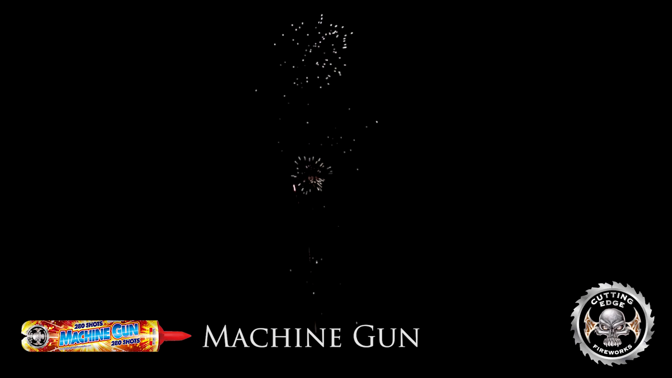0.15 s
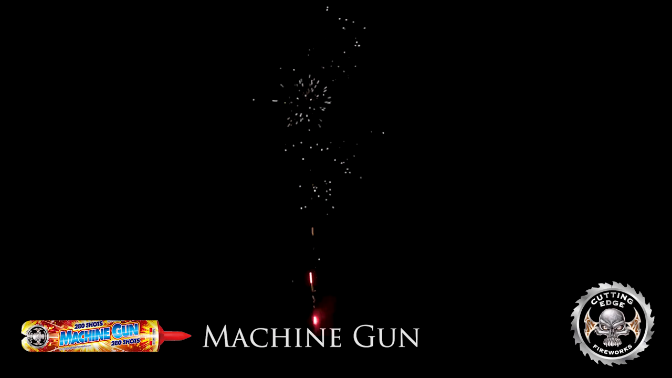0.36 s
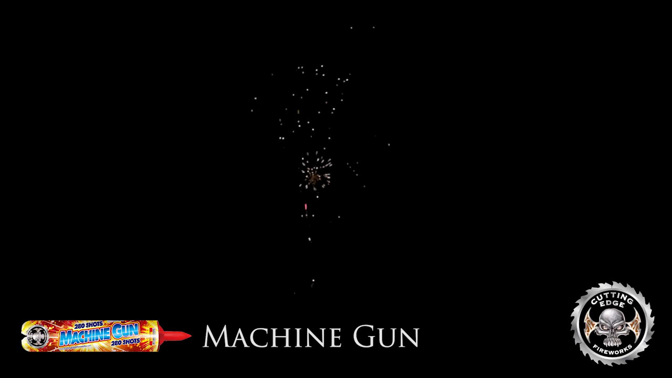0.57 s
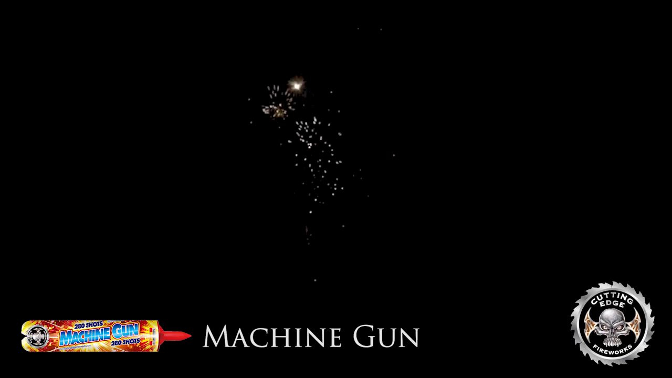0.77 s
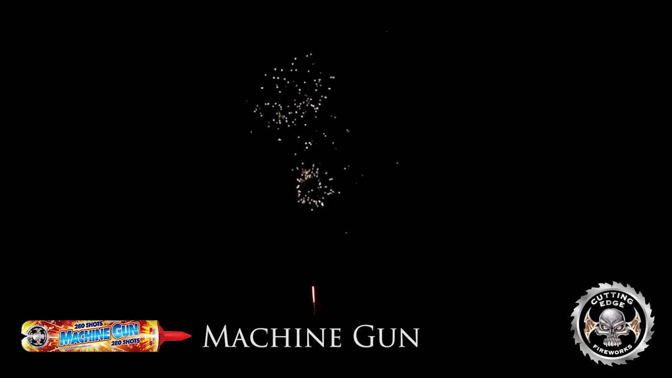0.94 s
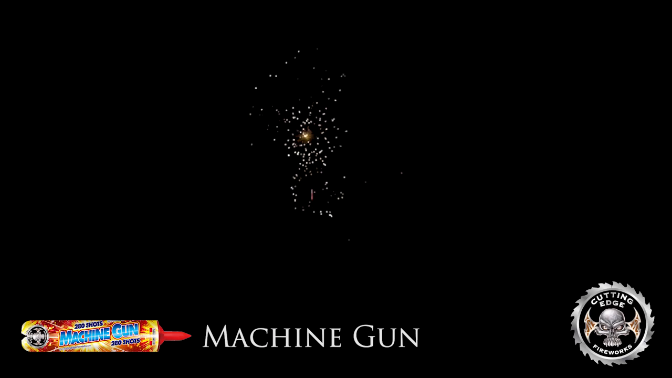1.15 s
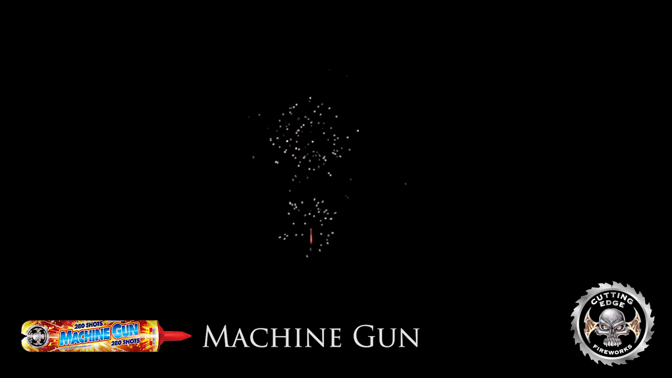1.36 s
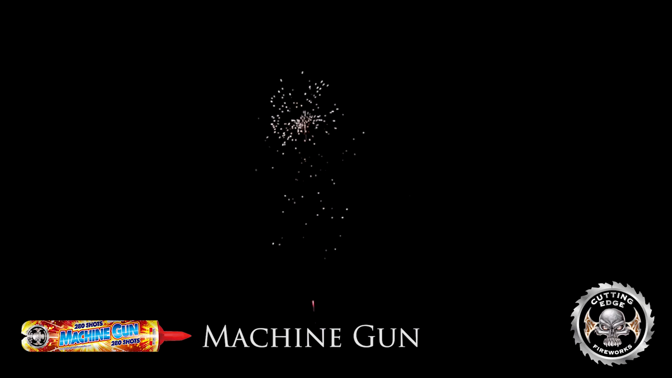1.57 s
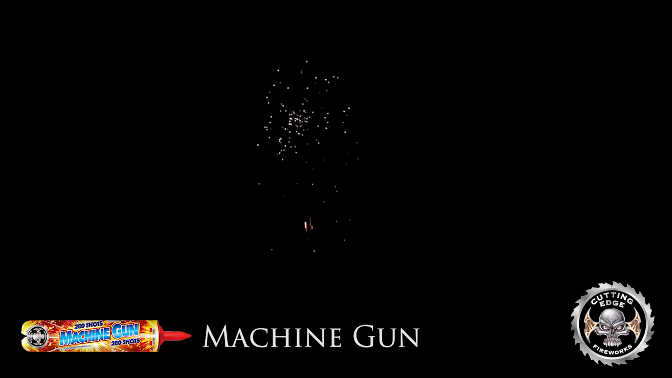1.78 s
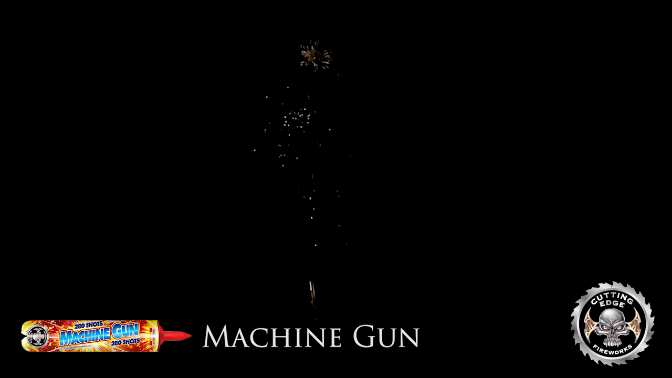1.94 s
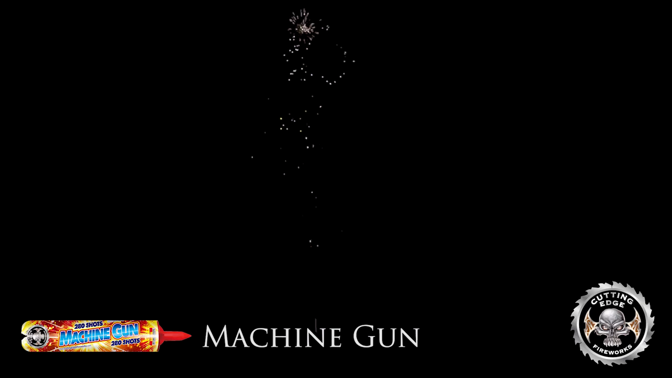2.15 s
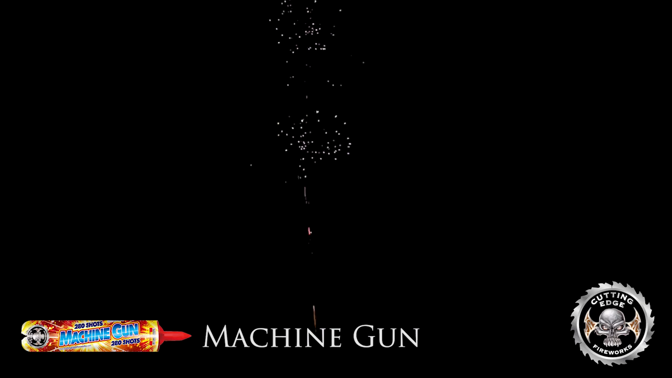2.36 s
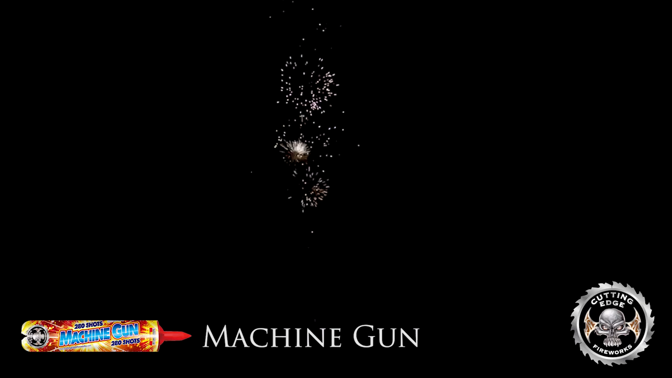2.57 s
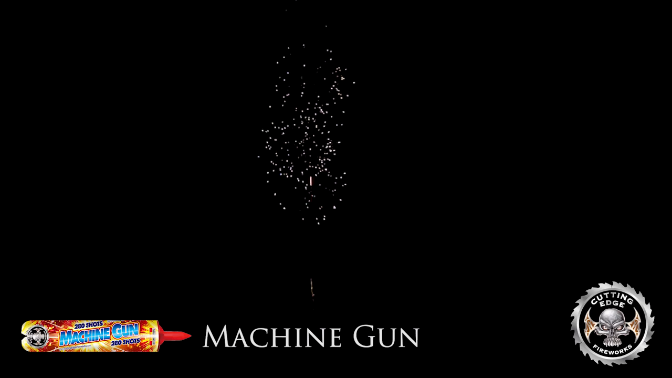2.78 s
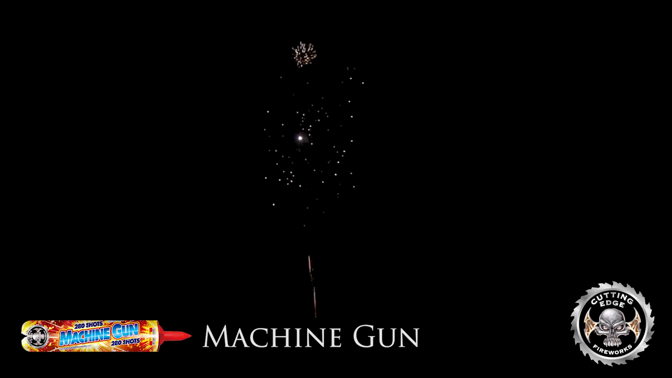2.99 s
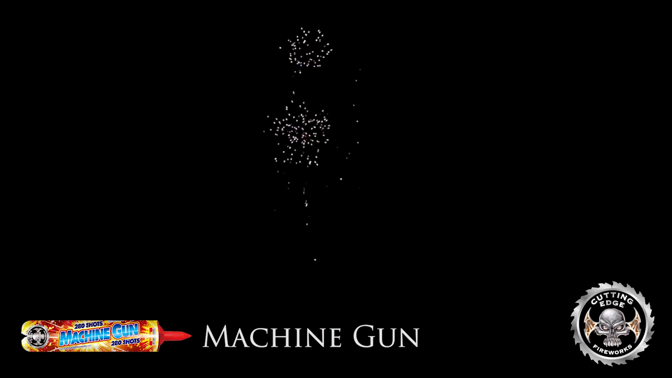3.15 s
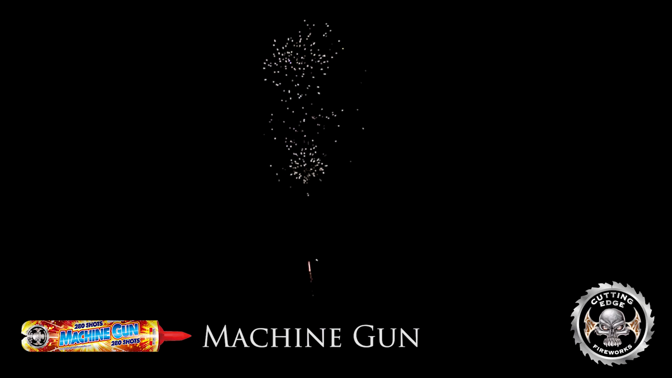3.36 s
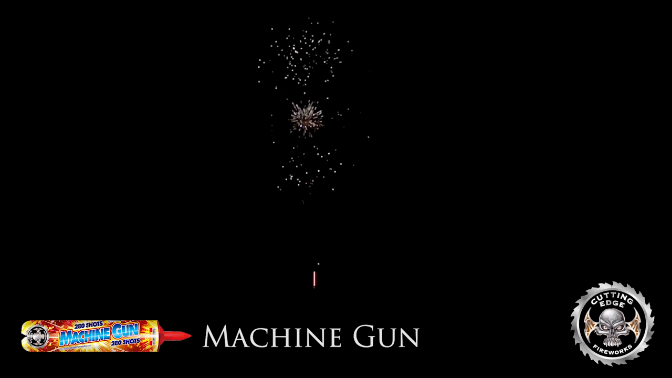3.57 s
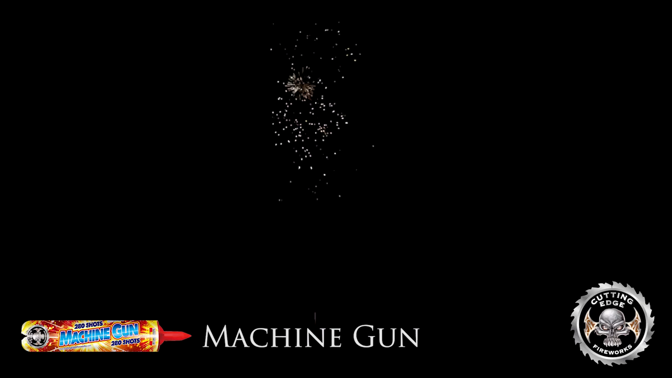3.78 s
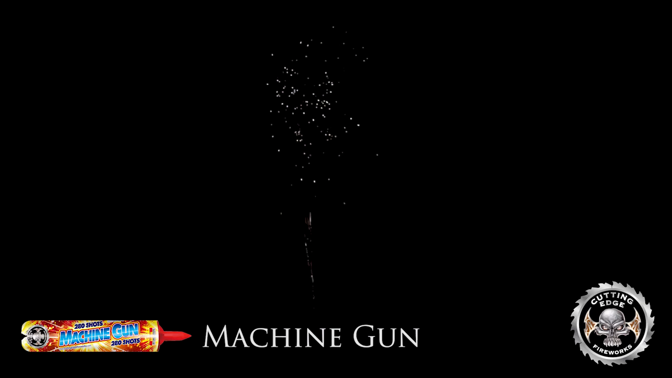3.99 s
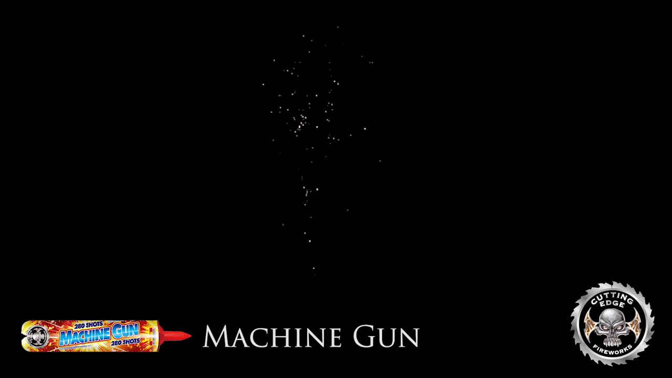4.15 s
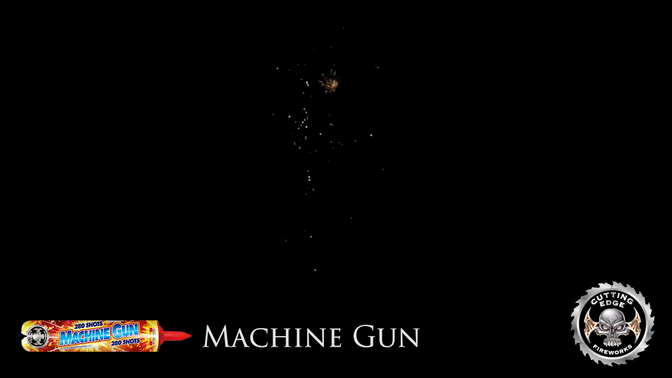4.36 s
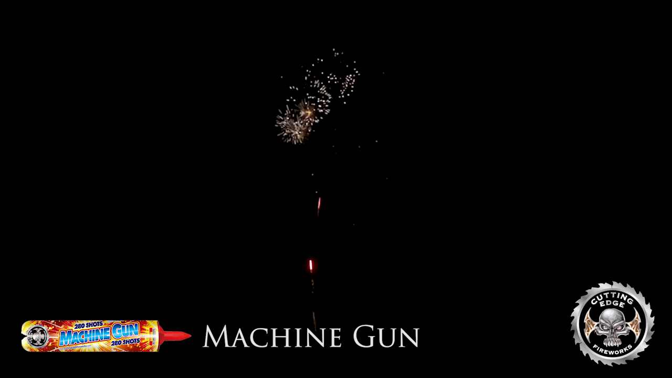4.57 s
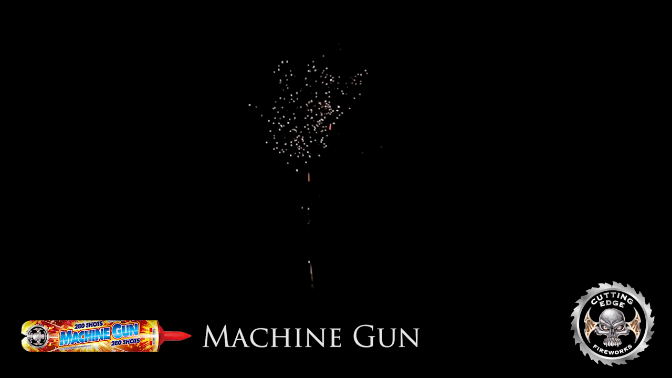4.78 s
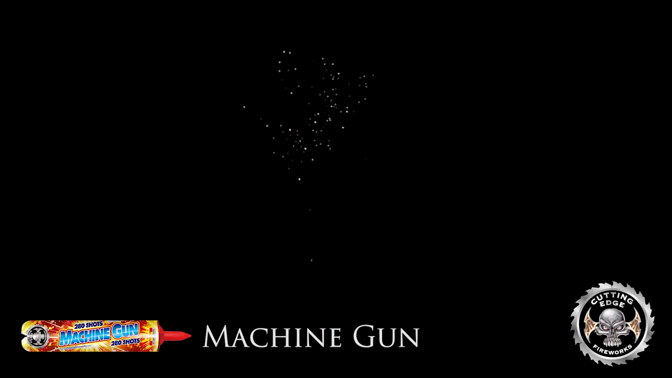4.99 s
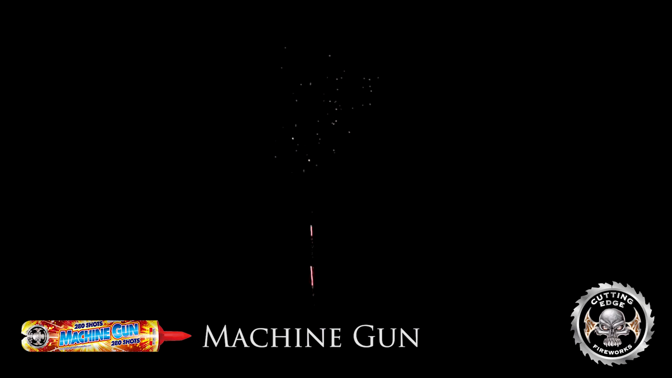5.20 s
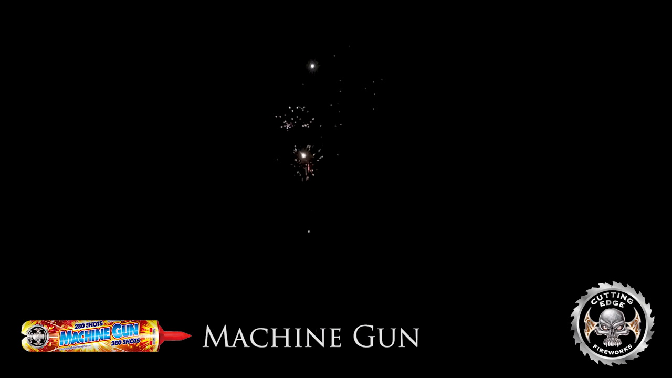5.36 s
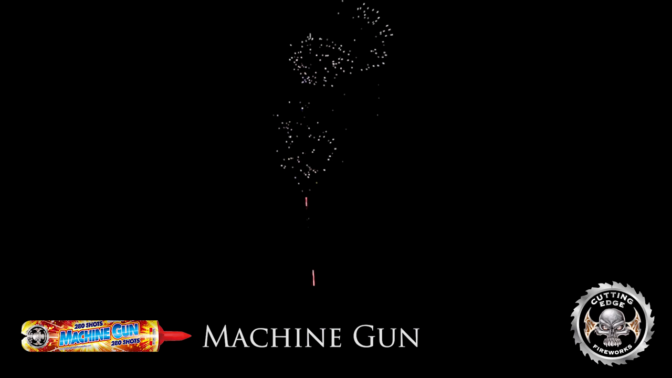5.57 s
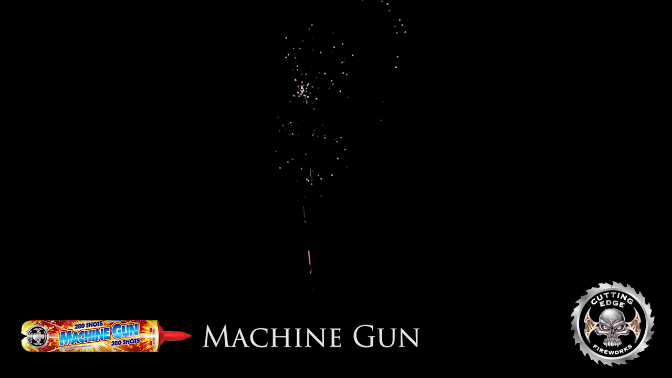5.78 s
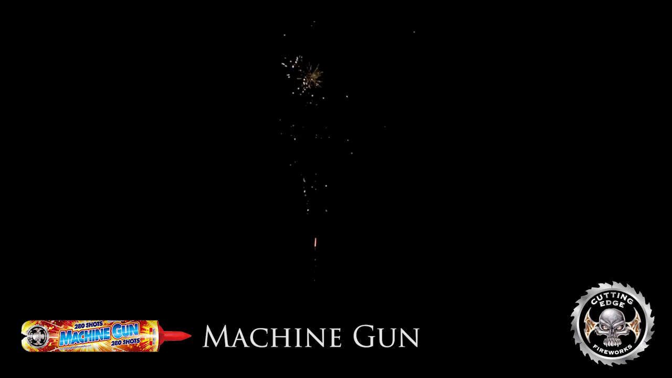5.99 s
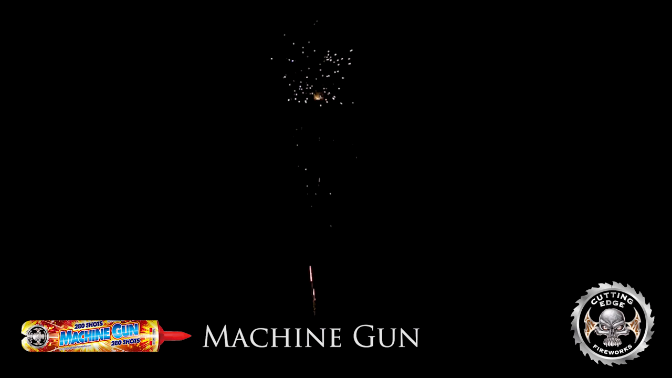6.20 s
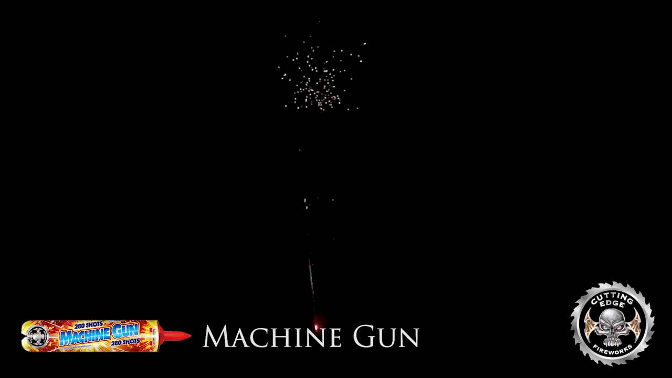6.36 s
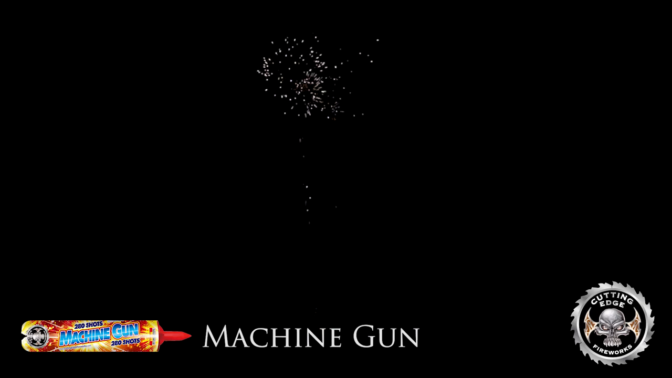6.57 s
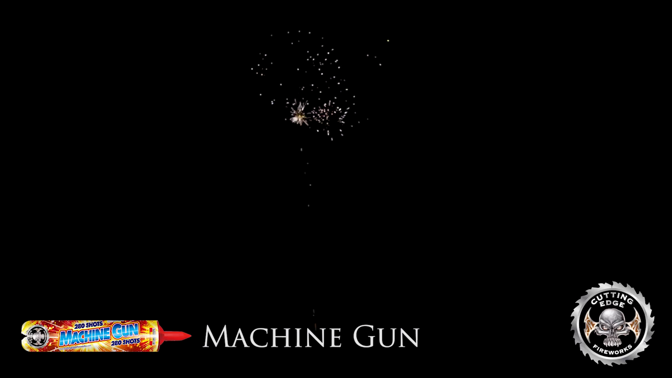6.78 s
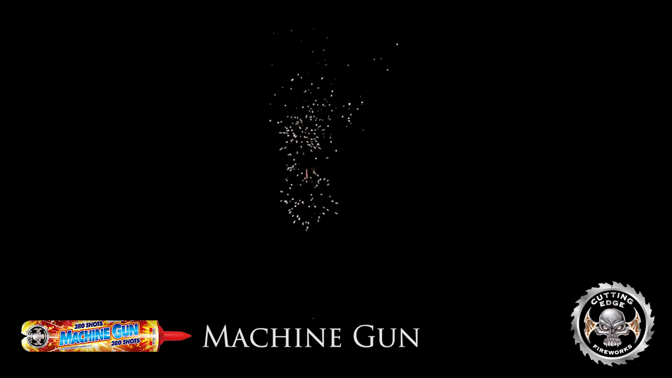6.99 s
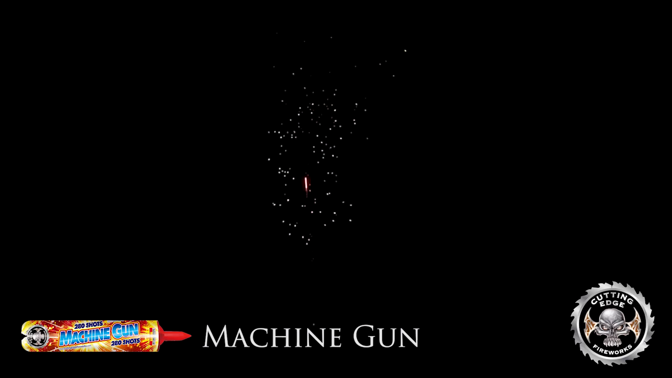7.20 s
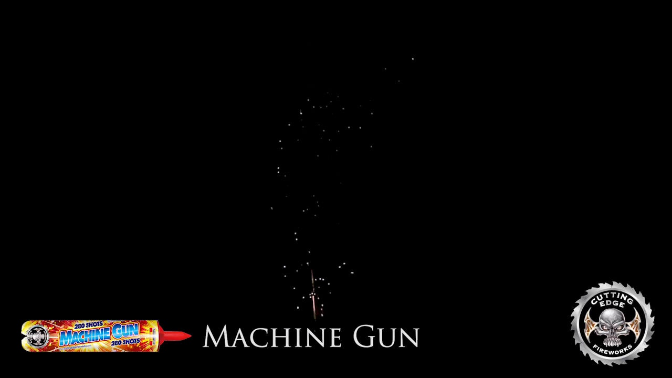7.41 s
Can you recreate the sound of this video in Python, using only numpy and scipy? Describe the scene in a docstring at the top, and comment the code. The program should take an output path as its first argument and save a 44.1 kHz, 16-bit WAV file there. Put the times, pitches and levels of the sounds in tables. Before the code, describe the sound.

A firework candle fires rapid sharp cracking bursts and low tube thumps in an open night field, with crackling sparks and faint insects.

```python
"""Insects sing in an open field at night, over the hush of the air and a little wind rumbling on the microphone.
Then a firework candle fires quickly: each lift charge thumps out of the tube with a puff of gas made of
spiky noise. Each star bursts overhead as a shock with a ground echo, then fizzes away in fine crackle and
single snaps made of random pops. One low thud is a fading sine. The small microphone overloads."""
import sys
import numpy as np
from scipy import signal
from scipy.fft import rfft, irfft, next_fast_len
from scipy.io import wavfile

SR = 44100
rng = np.random.default_rng(int(sys.argv[2]) if len(sys.argv) > 2 else 0)


def unload_audio(sound):
    """Save the sound as a 16-bit wav file, at the path given as the first command line argument."""
    columns = np.transpose(np.atleast_2d(sound))
    # keep every value between -1 and 1, then stretch to whole-number steps
    steps = np.round(np.clip(columns, -1, 1) * 32767)
    wavfile.write(sys.argv[1], SR, steps.astype(np.int16))


def makeup_ratio(level_db):
    """Linear amplitude ratio for a level in decibels (20 dB per factor of ten)."""
    decades = np.asarray(level_db, float) / 20
    return 10 ** decades


N = 328104


def rms_one(x):
    """Scale a sound to an rms of 1."""
    return x / np.sqrt(np.mean(x ** 2) + 1e-20)


def coloured(x, spectrum):
    """Shape a sound by a (frequency [Hz], gain [dB]) spectrum, then scale it to rms 1."""
    hz, db = np.transpose(spectrum)
    size = next_fast_len(N)
    log_hz = np.log(np.arange(size // 2 + 1) * SR / size + 1)
    gain = makeup_ratio(np.interp(log_hz, np.log(hz), db))
    return rms_one(irfft(rfft(x, size) * gain, size)[:N])


def band(x, low_hz, high_hz):
    """Keep only the sound between two frequencies."""
    return signal.sosfilt(signal.butter(2, [low_hz, high_hz], "band", fs=SR, output="sos"), x)


def drift(rate_hz):
    """Slow random wandering with spread 1, drawn at every 100th sample."""
    r = np.exp(-200 * np.pi * rate_hz / SR)
    slow = signal.lfilter([1], [1, -2 * r, r * r], rng.standard_normal(N // 100 + 502))[500:]
    return np.interp(np.arange(N) / 100, np.arange(len(slow)), rms_one(slow))


def add(out, s, shape, lead_ms):
    """Lay a shape down so that its zero time falls at s."""
    i = round((s - lead_ms / 1000) * SR)
    out[i:i + len(shape)] += shape[:N - i]


# insect choruses: (centre [Hz], width [Hz], throb rate [1/s], throb depth [0-1], level before throbbing [dB])
CHORUSES = [(2630, 190, 32, 0.35, -49.5), (6680, 950, 178.7, 0.6, -47)]


def insects():
    """Two choruses: noise in a narrow band, throbbing at the wing-stroke rate."""
    out, s = np.zeros(N), np.arange(N) / SR
    for hz, width_hz, per_s, depth, db in CHORUSES:
        song = rms_one(band(rng.standard_normal(N), hz - width_hz / 2, hz + width_hz / 2))
        throb = 1 + depth * np.sin(2 * np.pi * per_s * s + 1.5 * drift(3.0))
        out += makeup_ratio(db + 0.5 * drift(5.0)) * throb * song
    return out


# colour of the night's hush: (frequency [Hz], relative level per Hz [dB])
NIGHT_COLOUR = [(60, -5), (150, -10.5), (400, -15.5), (1000, -9), (2000, -7.5), (4500, -14), (11500, -21),
                (15500, -15.5)]


def night_air():
    """The broad hush of the night: steady coloured noise."""
    level_db = -45.5
    return makeup_ratio(level_db) * coloured(rng.standard_normal(N), NIGHT_COLOUR)


# wind on the microphone: (time [s], rumble level before its random swelling [dB])
WIND_LEVELS = [(0.0, -48), (1.14, -50), (2.09, -64), (3.11, -48), (3.47, -59), (7.08, -45), (7.3, -35)]


def wind():
    """Lumpy rumble: very low noise whose level wanders around a slow curve."""
    level_db = np.interp(np.arange(N) / SR, *np.transpose(WIND_LEVELS))
    return rms_one(band(rng.standard_normal(N), 24.5, 50.6)) * makeup_ratio(level_db + 3.8 * drift(9.2))


# lift charges: (time [s], thump strength [dB], gas puff strength [dB])
LIFT_CHARGES = [(0.041, -21.5, -30), (0.1406, -21.5, -28.5), (0.1514, -18, -26.5), (0.3308, -17.5, -22),
                (0.404, -22, -33.5), (0.498, -23, -32), (0.531, -22, -32), (0.854, -19, -25.5),
                (1.1733, -16.5, -21), (1.2399, -19, -20.5), (1.5299, -17, -25), (1.7883, -23.5, -33),
                (1.855, -24, -34), (1.8611, -24.5, -32), (2.104, -23, -38), (2.1214, -25, -29),
                (2.436, -18.5, -25), (2.6158, -19, -23.5), (2.6432, -18, -23.5), (2.8236, -20, -30),
                (2.945, -21.5, -30.5), (3.1065, -16.5, -24), (3.175, -23, -28), (3.181, -24, -26.5),
                (3.2255, -17.5, -24), (3.775, -20, -32), (4.1055, -18.5, -24), (4.1204, -20.5, -26),
                (4.183, -22, -22.5), (4.304, -40, -31), (4.6661, -18, -24.5), (4.837, -21.5, -37),
                (4.9378, -19, -27.5), (5.315, -19.5, -29.5), (5.4202, -16.5, -23.5), (5.786, -19, -25.5),
                (5.9, -19, -24), (5.956, -19.5, -28.5), (6.1003, -22, -35.5), (6.3455, -20.5, -31.5),
                (6.4077, -20.5, -22.5), (6.5404, -24, -29.5), (6.5527, -21.5, -27), (7.046, -20, -27),
                (7.2738, -16.5, -24.5)]
# pressure swings of one lift, direct and echoed: (time after the lift [ms], width [ms], height [ratio],
# share of the thump's dB that it follows [ratio], random spread [dB])
PRESSURE_SWINGS = [(0, 1.3, 1.14, 2, 1.5), (2.9, 1.57, -1.15, 1, 0.3), (5.8, 0.85, 0.17, 0.9, 0.5),
                   (8.38, 1.16, -0.19, 0, 8.5), (11.65, 3.8, 0.46, 1.4, 3), (20.5, 6.6, -0.088, 0, 6)]
# colour of the gas puff: (frequency [Hz], relative level per Hz [dB])
PUFF_COLOUR = [(290, -45), (500, -18), (705, -9), (2150, 2.5), (2900, -5.5), (3900, 0), (15400, -20.5)]


def lifts():
    """A soft low push out of the tube with its swings, and a ragged puff of gas riding on it."""
    usual_db = -20   # a thump of this strength leaves every swing at its own height
    out, ms = np.zeros(N), np.arange(-5, 60, 1000 / SR)
    spit = rng.standard_normal(N) * makeup_ratio(3.8 * np.minimum(rng.exponential(1, N), 4))
    spit = coloured(spit, PUFF_COLOUR) * makeup_ratio(3.15 * drift(140.0))
    throat = rms_one(band(band(rng.standard_normal(N), 156, 303), 156, 303))   # gas throbbing in the tube
    gust = np.clip((ms + 1.8) / 2.75, 0, 1) * (np.exp(-(ms / 8.6) ** 4) + 0.46 * np.exp(-ms / 20.5))
    throb_rise = np.clip(ms / 6.8, 0, 1)
    throb_fade = np.exp(-(ms / 13.5) ** 2) + 0.22 * np.exp(-ms / 53.0)
    chance = rng.standard_normal((len(LIFT_CHARGES), len(PRESSURE_SWINGS)))
    for k, (s, thump_db, puff_db) in enumerate(LIFT_CHARGES):
        wave = np.zeros(len(ms))
        for (at, width, height, share, spread_db), luck in zip(PRESSURE_SWINGS, chance[k]):
            swing_db = usual_db + share * (thump_db - usual_db) + spread_db * luck
            wave += height * makeup_ratio(swing_db) * np.exp(-((ms - at) / width) ** 2)
        piece = slice(k * len(ms), (k + 1) * len(ms))   # fresh noise for every lift
        wave += makeup_ratio(thump_db - 14.5) * throat[piece] * throb_rise * throb_fade
        wave += makeup_ratio(puff_db) * gust * spit[piece]
        add(out, s, wave, lead_ms=5)
    return out


def shock(ms, push, push_ms, pull, pull_ms):
    """A short overpressure ending at 0, then a sudden suction that fills in again."""
    front = np.exp(-((ms + push_ms / 2) / (push_ms / 2)) ** 4)
    after = np.maximum(ms, 0) / pull_ms
    return push * front - pull * np.tanh(5.4 * after) * np.exp(-after ** 1.46)


# star bursts: (time [s], suction strength [dB], ground echo lag [ms], strength of the crackle afterwards [dB],
# treble chatter strength [dB])
STAR_BURSTS = [(0.2241, -11.5, 3.5, -32, 2), (0.3787, -8.5, 2.35, -33, -28), (0.5727, -8, 3.27, -28.5, 0),
               (0.7848, -12, 2.5, -33, -5), (0.9535, -9.5, 2.77, -28, -2), (0.9997, -13.5, 3, -69, -5),
               (1.0506, -9.5, 3.44, -31, 0), (1.1168, -14.5, 2.14, -39, -7), (1.2667, -9.5, 2.77, -33, -26),
               (1.417, -9.5, 3, -29.5, -10), (1.5105, -9, 2.7, -29, -5), (1.6891, -9.5, 3.13, -31, -3),
               (1.7732, -22.5, 2.74, -50, -24), (2.1653, -13, 3.03, -34.5, -13),
               (2.1905, -8.5, 3.6, -33, -2), (2.4056, -10.5, 3.67, -32.5, 0),
               (2.4467, -10.5, 2.83, -33, -10), (2.6646, -9.5, 2.65, -32.5, -33),
               (2.7033, -11.5, 3.3, -34, -7), (2.7934, -10, 2.3, -34, -7), (2.827, -10.5, 2.6, -31, -11),
               (3.2112, -12, 3.33, -42, -13), (3.277, -9, 2.75, -31.5, -10), (3.3136, -11, 3, -38.5, -24),
               (3.499, -8.5, 3.5, -29, 0), (3.5538, -18, 2.65, -63, -3), (3.7246, -11, 3.5, -33.5, 0),
               (3.7829, -12, 2.9, -34, -12), (3.818, -10, 3.07, -37, 1), (4.0252, -9.5, 3.4, -33.5, -29),
               (4.5195, -14, 3.34, -41.5, -9), (4.6135, -14, 3.05, -38.5, -4), (4.7595, -9.5, 3.2, -33, -6),
               (4.8008, -10, 2.95, -36.5, -9), (4.823, -11, 2.96, -43, -1), (4.829, -20, 2.1, -39, -22),
               (4.883, -9, 3.14, -28.5, -27), (5.4879, -15, 2.82, -41.5, -15), (5.575, -10, 2.6, -31, -5.5),
               (5.6412, -14, 2.55, -53, -6), (5.658, -11, 3.35, -50.5, -7), (5.674, -9, 3.5, -29, -6),
               (5.8651, -26.5, 2.93, -40, -19), (6.1895, -14, 3.6, -37, -33),
               (6.237, -10.5, 3.43, -32.5, -16), (6.4631, -18.5, 3.05, -38.5, -11),
               (6.4974, -8.5, 3.33, -39, -16), (6.7097, -9.5, 3.56, -29.5, -10),
               (6.8003, -9, 3.34, -60, -10), (6.819, -14, 3.3, -29, -22), (6.9736, -10.5, 2.94, -48, -17),
               (7.039, -10, 2.94, -33, -25), (7.1636, -8.5, 2.16, -46, 1), (7.1785, -14.5, 2.6, -31.5, -18),
               (7.2045, -11, 2.85, -34, -13)]


def bursts():
    """Direct shock, a weak echo from something near, the strong ground echo and a short scatter."""
    chatter_hz, near_echo_ms = 6460, 1.848   # both shifted a little by chance at each burst
    out, ms = np.zeros(N), np.arange(-2, 30, 1000 / SR)
    chance = rng.random((len(STAR_BURSTS), 3))
    for (s, depth_db, lag_ms, _, chatter_db), (a, b, c) in zip(STAR_BURSTS, chance):
        depth = makeup_ratio(depth_db)
        push_ms = 0.017 + 0.34 * depth   # a larger charge pushes longer
        wave = shock(ms, 0.71, push_ms, 1.146 * depth, 0.73)
        near_ms = near_echo_ms * (0.97 + 0.06 * b)
        wave += (0.2 + 0.6 * a) * depth * shock(ms - near_ms, 0.9, 0.14, 0.6, 0.2)
        ground_ms = ms - lag_ms - push_ms / 2
        wave += shock(ground_ms, 0.29 + 0.5 * depth, 1.64 * push_ms, 0.4 * depth, 1.0)
        late = np.maximum(ms - lag_ms, 0) / 3.5
        wave += 0.065 * depth * late * np.exp(-late)   # slow low rebound of the air
        rise = np.exp((ms + 0.31) / 0.028)
        fall = 0.74 * np.exp(-(ms + 0.26) / 0.14) + 0.19 * np.exp(-ms / 0.81)
        swell = np.where(ms < -0.35, rise, fall)
        phase = 2 * np.pi * chatter_hz * (0.92 + 0.1 * c) * (ms + push_ms / 2) / 1000
        wave += makeup_ratio(chatter_db) * swell * np.cos(phase)   # the diaphragm chatters around the front
        scatter = band(rng.standard_normal(len(ms)), 470, 9200) * (ms > 0) * np.exp(-ms / 4.3)
        wave += makeup_ratio(-14.5) * np.sqrt(depth) * scatter
        ripple = band(rng.standard_normal(len(ms)), 4800, 16400) * (ms > -push_ms) * np.exp(-ms / 0.22)
        wave += makeup_ratio(-9.5 - 0.071 * chatter_db) * ripple   # the torn front leaves a short bright ripple
        add(out, s, wave, lead_ms=2)
    return out


def burst_sparks():
    """One spike at each burst, as strong as the crackle that it leaves."""
    sparks = np.zeros(N)
    sparks[[round(row[0] * SR) for row in STAR_BURSTS]] = makeup_ratio([row[3] for row in STAR_BURSTS])
    return sparks


# colour of the crackle's pops: (frequency [Hz], relative level per Hz [dB])
CRACKLE_COLOUR = [(300, -6), (525, -14), (999, -3.5), (1340, -1.5), (2100, 0.5), (4120, -0.5), (6120, 0.5),
                  (15400, -12)]


def crackle():
    """Every burst leaves sparks that fizz up, then thin out; power of the showers adds."""
    s = np.arange(SR // 2) / SR
    shower = (1 - np.exp(-s / 0.026)) ** 2 * np.exp(-s / 0.048) * 2.93 + 0.065 * np.exp(-s / 0.12)
    power = np.maximum(signal.fftconvolve(burst_sparks() ** 2, shower)[:N], 0)
    sizes = makeup_ratio(2.2 * np.minimum(rng.exponential(1, N), 4.5)) * rng.choice([-1, 1], N)
    born = rng.random(N) < 9000 * makeup_ratio(1.5 * drift(30.0)) / SR   # pops come in clumps
    pops = coloured(sizes * born, CRACKLE_COLOUR)
    dull = signal.sosfilt(signal.butter(2, 3500, fs=SR, output="sos"), pops)
    bright = (power / power.mean()) ** 0.034   # dying showers lose their treble first
    fizz = dull * makeup_ratio(2.2 * drift(40.0)) + (pops - dull) * makeup_ratio(1.6 * drift(35.0)) * bright
    return np.sqrt(power) * fizz


# lone snaps of falling sparks: (time [s], strength [dB])
LONE_SNAPS = [(1.8141, -11), (1.8293, -7), (2.0204, -18), (2.0538, -20), (3.0615, -19), (3.8584, -7),
              (4.214, -17), (4.3057, -13), (4.3819, -20), (4.8423, -12), (5.8913, -13), (5.9188, -7),
              (5.9251, -15)]


def snaps():
    """Single thin pops of late sparks, most frequent in the wake of the bursts, each with a faint ground echo."""
    per_s, smallest_db, wake_s = 150, -34, 0.17   # rate before clustering, weakest random snap, fade of the wake
    ms = np.arange(-1, 5, 1000 / SR)
    wake = signal.lfilter([1], [1, -np.exp(-1 / (wake_s * SR))], burst_sparks())
    rate = per_s * wake / wake.mean() * makeup_ratio(5.0 * drift(15.0))   # in clusters
    born = rng.random(N) < rate / SR
    clicks = born * makeup_ratio(smallest_db + 4.0 * np.minimum(rng.exponential(1, N), 3))
    clicks[[round(s * SR) for s, db in LONE_SNAPS]] = makeup_ratio([db for s, db in LONE_SNAPS])
    pop = shock(ms, 1, 0.075, 0.5, 0.12) + 0.35 * shock(ms - 2.9, 1, 0.12, 0.4, 0.2)
    return np.convolve(clicks, pop)[SR // 1000:][:N]


# a low thud: (time [s], pitch [Hz], level at its start [dB], time to fade by 60 dB [s])
LOW_THUD = (7.3848, 87, -21.0, .2)


def thud():
    """One low sine that starts with a suction and dies away."""
    at, hz, db, fade_s = LOW_THUD
    since = np.maximum(np.arange(N) / SR - at, 0)
    return -makeup_ratio(db - 60 * since / fade_s) * np.sin(2 * np.pi * hz * since)


def scene():
    """All the sounds of the field added together, as one channel."""
    return (insects() + night_air() + wind() + lifts() + bursts() + crackle() + snaps() + thud())[None]


def band_limit(x):
    """A steep low-pass at the top of the band."""
    return signal.sosfilt(signal.butter(12, 16970, fs=SR, output="sos"), x)


def record(dry):
    """The top is cut, then peaks hit a nearly hard ceiling that spills a little treble back; deepest bass cut."""
    ceiling = 0.365   # full scale is 1
    dulled = signal.sosfiltfilt(signal.cheby2(12, 25, 15900, fs=SR, output="sos"), dry)
    clipped = dulled / (1 + np.abs(dulled / ceiling) ** 8) ** (1 / 8)
    coupled = signal.sosfilt(signal.butter(1, 14, "high", fs=SR, output="sos"), clipped)
    # the spilled treble is cut at the very top
    trimmed = signal.sosfiltfilt(signal.cheby2(12, 25, 16550, fs=SR, output="sos"), coupled)
    return band_limit(trimmed)


dry = scene()
out = record(dry)
unload_audio(out)
```